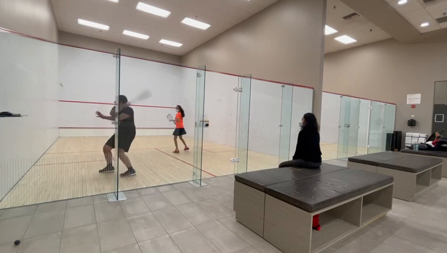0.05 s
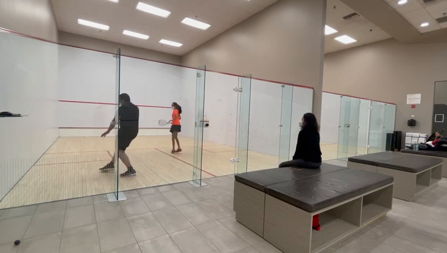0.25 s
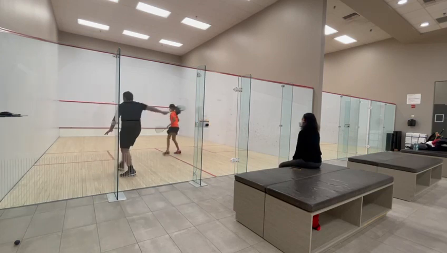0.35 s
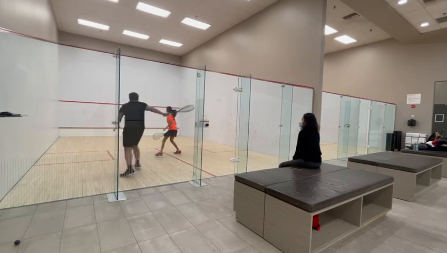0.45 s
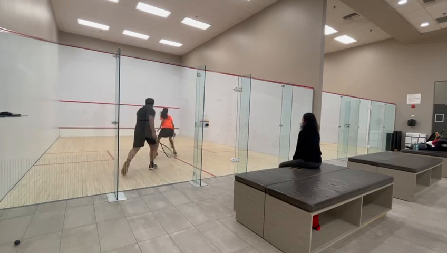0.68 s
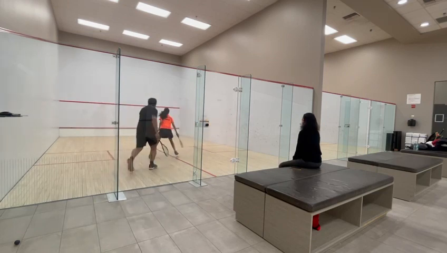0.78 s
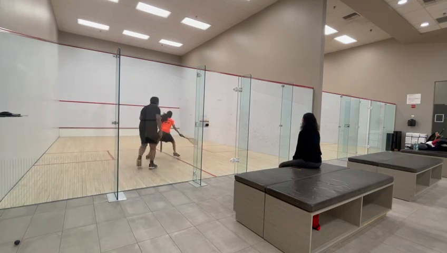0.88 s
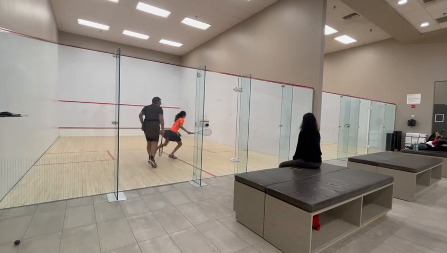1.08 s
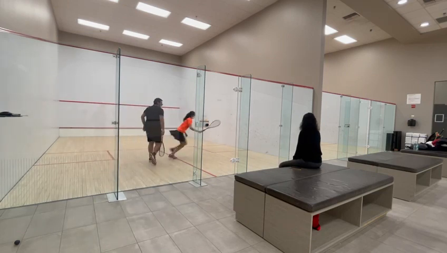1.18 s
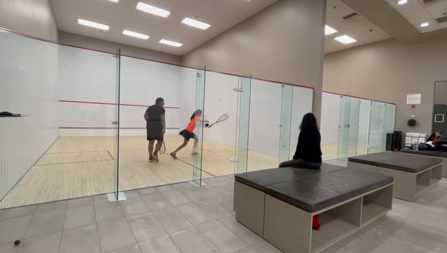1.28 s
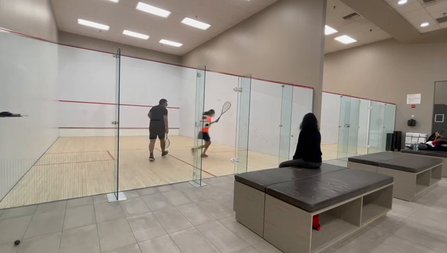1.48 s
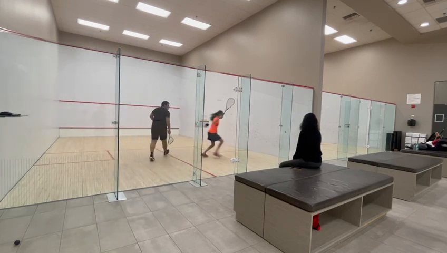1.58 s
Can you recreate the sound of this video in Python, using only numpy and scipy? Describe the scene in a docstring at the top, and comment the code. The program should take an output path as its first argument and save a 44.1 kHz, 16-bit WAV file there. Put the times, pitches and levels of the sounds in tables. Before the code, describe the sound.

Sharp racket hit and hard ball knock on a wall, ringing through a reverberant squash court

```python
"""A squash court, heard through its glass back wall: a swish and racket smack with its echo from the front
wall, the ball on the wall with a panel knock, a soft floor bounce and shoe scuffs, as an earlier sound fades in
the hall. Bands of noise make their echoes and the hall behind; decaying sine waves ring in racket frame, wall,
glass and court. Dry snaps lead some blows. Footfalls thud in the sprung floor, whose rumble lies over
ventilation hum. A phone's two microphones listen."""
import sys
import numpy as np
from scipy import signal
from scipy.fft import rfft, irfft
from scipy.io import wavfile
from scipy.ndimage import uniform_filter1d

SR = 44100
rng = np.random.default_rng(int(sys.argv[2]) if len(sys.argv) > 2 else 0)


def materialize(psi):
    """Save the field psi as 16-bit PCM at rate SR to the path in sys.argv[1].

    A 1-D psi becomes a single channel; in a 2-D psi each row is a channel.
    """
    bounded = np.clip(np.atleast_2d(psi).T, -1, 1)
    quanta = np.round(bounded * 32767).astype(np.int16)
    wavfile.write(sys.argv[1], SR, quanta)


def ratio(d):
    """dB to gain"""
    e = np.asarray(d, float) / 20
    return 10 ** e


N = 72765  # samples, 1.65 s

# Colour of each kind of sound, only its shape counts: [f/Hz, relative level per Hz/dB]
RACKET_COLOUR = [(88, -35), (170, -14.5), (450, -3), (990, -8.5), (1170, -19), (2070, -9), (2280, -17),
                 (2640, -8), (5530, -24.5), (6530, -9.5), (12500, -40), (16200, -91), (22000, -120)]
RETURN_COLOUR = [(150, -71), (290, -17), (380, 0), (560, -16), (1090, -3.5), (1760, -10.5), (2600, -18.5),
                 (3300, -20.5), (8160, -29.5), (9460, -38), (10400, -70)]
WALL_COLOUR = [(220, -46), (330, -4.5), (800, -3.5), (1280, -1.5), (1640, -10.5), (2500, -11), (3300, -16),
               (5550, -15.5), (8190, -18), (11500, -12), (12500, -72), (16200, -104), (22000, -120)]
KNOCK_COLOUR = [(150, -23), (220, -25), (300, -21), (1000, -13), (1500, -8), (1950, -2), (2600, -5),
                (3300, -35), (5600, -43), (9000, -38), (10500, -59)]  # the wall panel
BOUNCE_COLOUR = [(120, -76), (200, -32), (317, -20), (361, -14), (403, -7.5), (546, -8), (1060, -2.5),
                 (1800, -12.5), (2600, -19), (3400, -31), (9000, -66), (11700, -95), (19800, -120)]
SCUFF_COLOUR = [(700, -36), (2000, 2), (3200, -4), (4200, -3.5), (6500, -13), (8500, -14), (10000, -41)]
SWISH_COLOUR = [(500, -8), (1500, -2), (3000, 1.5), (6500, -2), (9000, -16), (12000, 5)]
HALL_COLOUR = [(88, -33), (150, -14.5), (260, -7), (307, -7.5), (739, -14.5), (905, -9), (2430, -25.5),
               (2570, -32), (8790, -48), (10200, -57), (12000, -16), (15600, -75), (22000, -120)]

# Arrivals of each kind: [t/s, first echoes level/dB, rise time constant/s, first echoes t60/s, # reverberation
# level/dB, left minus right of the first echoes/dB]; the first scuff row, set before the start, # is the fading
# hall tail of an earlier sound
RACKET_ARRIVALS = [(0.2321, -15, 0.00074, 0.068, -22.5, 6.5)]
RETURN_ARRIVALS = [(0.275, -0.5, 0.026, 0.09, -29, 0), (0.297, -10.5, 0.0056, 0.084, -35, 0.98)]
WALL_ARRIVALS = [(0.389, -7, 0.0075, 0.053, -45, 0.83), (0.394, -10, 0.002, 0.13, -21.5, 1)]
KNOCK_ARRIVALS = [(0.403, -9.5, 0.0025, 0.082, -32, 3.5), (0.448, -36, 0.0075, 0.05, -26.5, 2)]
BOUNCE_ARRIVALS = [(0.218, -30, .004, 0.103, -21, 3.3), (.61, -33, 0.0033, 0.078, -53, 1.2),
                   (0.863, -17, 0.011, 0.1, -29.5, 2), (.97, -21, 0.02, 0.16, -30, 2),
                   (1.09, -26, 0.017, 0.28, -43, 2)]
SCUFF_ARRIVALS = [(-.05, -49.5, .01, 0.44, -56, 1), (1.003, -48.5, .002, 0.052, -51.5, 0.93),
                  (1.183, -39, 0.0012, 0.045, -50, 1), (1.21, -48, .02, 0.28, -73, 1),
                  (1.43, -68, 0.033, 0.23, -51.5, 0.33), (1.468, -42.5, 0.0025, 0.064, -52.5, 1)]

# Time the long reverberation takes to fall 60 dB: [f/Hz, t60/s]
REVERB_T60 = [(100, 0.58), (250, 2.4), (400, 1.92), (700, 3.26), (1100, 2.71), (2000, 1.81), (3000, 1.35),
              (4500, 0.98), (6500, 0.71), (8500, 0.61), (10000, 0.3), (12000, .1)]

# Dry snaps: [t/s, peak level/dB, left minus right/dB, a seventh of the t60/s]
SNAPS = [(0.2322, -12.5, 7, 0.003), (0.41, -28, -6, .002), (1.186, -55, -7, 0.0012)]

# Notes at which each part rings: [f/Hz, relative level/dB, t60/s]
FRAME_MODES = [(1169, 21, 0.077), (3040, -9, 0.016), (6700, -5, .02), (8400, -1, .015)]
WALL_MODES = [(267, -1, .06), (1255, -8, .08), (1867, 1, .08), (2195, 0, .08), (2450, -1, .08),
              (2880, -8, .07)]
GLASS_MODES = [(342, 0, .1), (378, -18, .4), (402, -19, .35), (436, -9, .1)]
COURT_MODES = [(573.7, -3, 1), (662, -9, 0.43), (828, -5, 0.95), (831, 7, 0.74), (1020, 6, 0.63),
               (1128, 7, 0.66), (1250, 5, .7), (1380, -19, 0.52), (2260, -12, 0.36), (2464, -6, 0.41),
               (2646, -4.5, .6)]

# Times those parts are set ringing: [t/s, highest short-time level/dB, push time/s,
# blow over the shaking/dB, left minus right/dB]; a negative push gives the shortest shaking
FRAME_RING = (.2335, -24, -0.0723, 16.5, 10.5)  # a single row
WALL_RING = (.4, -16.5, .005, 18, 0)  # a single row
GLASS_RINGS = [(.24, -27, .01, 20, 0), (.273, -15.5, .012, 27, 0), (.354, -24, .012, 20, 0),
               (.452, -24, .012, 20, 0)]
COURT_RINGS = [(.29, -34, 0.058, 0, 2), (.44, -24.5, 0.14, 0, 2.5), (.87, -34.5, 0.19, 0, 1.7)]

# Thuds of the floor boards: [t/s, starting level/dB, f/Hz, t60/s]
THUDS = [(0.073, -27.5, 57.7, 0.61), (0.147, -47, 60.3, 0.22), (0.237, -28.5, 47.6, 0.37),
         (0.404, -35.5, 155, 0.82), (0.941, -36, 53.3, 0.46), (1.09, -37, 68, 0.19), (1.24, -43, 74.4, 0.2),
         (1.418, -37, 70.4, 0.24), (1.419, -33.5, 133, 0.65), (1.42, -52, 184, 0.75), (1.53, -29, 65, 0.27),
         (1.6, -47, 55.6, 0.18)]

# Rumble of the sprung floor: [t/s, deep band level/dB, higher band level/dB]
RUMBLE = [(0.0, -41.5, -44), (0.16, -36.5, -45), (0.202, -48, -46), (0.241, -44, -36), (0.366, -40.5, -45),
          (0.404, -35, -40), (0.496, -46.5, -39), (0.744, -65, -59), (0.772, -44, -55), (0.836, -61, -54),
          (0.946, -52, -49.5), (1.134, -37, -62), (1.152, -43, -48.5), (1.282, -39, -39.5),
          (1.346, -49.5, -48.5), (1.446, -36.5, -34), (1.63, -41, -43.5), (1.65, -56, -34.5)]

# Likeness of left and right noise, limited to -0.95..0.999 in use: [f/Hz, likeness]
LIKENESS = [(60, 3), (130, 0.7), (270, 0.78), (580, -0.1), (1240, -0.03), (2650, -0.14), (5640, 0.19),
            (12000, -0.61)]
# Leaning of the court and hall sound to one side: [f/Hz, left minus right/dB]
LEAN = [(60, 0.0), (110, -1), (190, 2.5), (350, -0.5), (630, 2.5), (1140, 2.5), (2060, 1), (3700, 4),
        (6680, 8), (12000, -9.5)]
# Colour of the microphone ports: [f/Hz, gain/dB]
PORTS = [(1900, -0.5), (2500, -3), (3200, -1.5), (4000, 0), (4800, -2.5), (5200, 1), (5650, -11),
         (6100, 1.5), (6600, 0.5), (7100, -2.5), (7450, -12.5), (7900, 3.5), (8500, 4), (9400, -2.5),
         (10000, -3), (10800, -24.5), (11600, -2.5), (12400, -43)]


def at(table, hz):
    """Reads a table between its rows, with pitch spaced as the ear hears it (log frequency)."""
    rows = np.array(table, float)
    return np.interp(np.log(np.maximum(hz, 1)), np.log(rows[:, 0]), rows[:, 1])


def swell(t, rise, t60):
    """Power that builds up with time constant rise and dies away by 60 dB in t60."""
    t = np.maximum(t, 0)
    build_up = (1 - np.exp(-t / max(rise, 1e-4))) ** 2
    return build_up * 10 ** (-6 * t / max(t60, 0.01))


def pan(pan_db):
    """Left and right gains, half the level difference to each side."""
    return ratio(pan_db * np.array([[0.5], [-0.5]]))


def band(spectra, lo_hz, hi_hz):
    """Left and right noise of one soft-edged band, rms 1, mixed from mid and side to the likeness table."""
    f = np.arange(spectra.shape[1]) * SR / N
    place = np.log(np.maximum(f, 1) / lo_hz) / np.log(hi_hz / lo_hz) - 0.5  # 0 in mid-band
    window = np.where(abs(place) < 1, np.cos(np.pi / 2 * place), 0)
    mid, side = irfft(spectra * window, N)
    likeness = np.clip(at(LIKENESS, np.sqrt(lo_hz * hi_hz)), -0.95, 0.999)
    pair = np.sqrt(1 + likeness) * mid + np.sqrt(1 - likeness) * side * np.array([[1], [-1]])
    return pair / np.sqrt(np.mean(pair ** 2))


def share(colour, mids):
    """Splits a sound's power among bands: power per Hz times a width proportional to pitch."""
    power = ratio(2 * at(colour, mids)) * mids
    return power / np.sum(power)


def snaps():
    """A short dry crack of treble-heavy noise, the same at both microphones but for level."""
    out, t = 0, np.arange(N) / SR
    for start, db, pan_db, length in SNAPS:
        noise = np.diff(rng.standard_normal(N + 1))  # differences favour the treble
        crack = noise * np.sqrt(swell(t - start, 0.00014, 7 * length))
        out = out + crack / np.max(abs(crack)) * ratio(db) * pan(pan_db)
    return out


def court():
    """The hard court as bands of noise: echoes of every arrival, the swish and the hall set each band's power."""
    t = np.arange(0, N, 16) / SR  # levels move in steps of 16 samples
    edges = 140 * 2 ** (np.arange(21) / 3)  # third-octave bands, Hz
    mids = np.sqrt(edges[1:] * edges[:-1])
    kinds = [(RACKET_COLOUR, RACKET_ARRIVALS), (RETURN_COLOUR, RETURN_ARRIVALS), (WALL_COLOUR, WALL_ARRIVALS),
             (KNOCK_COLOUR, KNOCK_ARRIVALS), (BOUNCE_COLOUR, BOUNCE_ARRIVALS), (SCUFF_COLOUR, SCUFF_ARRIVALS)]
    kinds = [(share(colour, mids), rows) for colour, rows in kinds]
    swish_share, hall_share = share(SWISH_COLOUR, mids), share(HALL_COLOUR, mids)
    spectra = grainy_noise(len(t)) * ragged(N // 2 + 1)
    out = 0
    for k, hz in enumerate(mids):
        power = hall_share[k] * hall_power() + swish_share[k] * swish_power(t)
        for part, rows in kinds:
            power = power + part[k] * echo_power(t, rows, hz)
        gain = np.sqrt(power) * flicker(len(t)) * pan(at(LEAN, hz))
        smooth_gain = np.array([np.interp(np.arange(N) / SR, t, side) for side in gain])
        out = out + band(spectra, edges[k], edges[k + 1]) * smooth_gain
    return out


def echo_power(t, arrivals, hz):
    """Each arrival gives a quick cluster of first echoes, panned, and a central tail that dies at its band's rate."""
    power, build_s = np.zeros((2, len(t))), 0.02
    for start, first_db, rise, t60, tail_db, pan_db in arrivals:
        cluster = ratio(2 * first_db) * swell(t - start, rise, t60) * pan(pan_db) ** 2
        tail = ratio(2 * tail_db) * swell(t - start, build_s, at(REVERB_T60, hz))
        power = power + cluster + tail
    return power


def swish_power(t):
    """The strings swish ever louder through the air just before the blow."""
    return ratio(2 * np.interp(t, (0.19, 0.232), (-62.5, -29.5), left=-99, right=-99))


def grainy_noise(count):
    """Spectra of two noises whose level jitters quickly, like crowded small echoes."""
    grain_db = 0.5  # per unit of jitter, which averages 1
    grain = uniform_filter1d(rng.exponential(1, (2, count)), size=4)
    jitter = np.repeat(grain, 16, axis=1)[:, :N]
    return rfft(rng.standard_normal((2, N)) * ratio(grain_db * jitter))


def ragged(bins):
    """Uneven room resonances: random peaks and dips along frequency."""
    depth_db, width_hz = 1.1, 27
    k = max(int(width_hz * N / SR), 1)
    bumps = uniform_filter1d(uniform_filter1d(rng.standard_normal((2, bins)), k), k)
    return ratio(depth_db * bumps / bumps.std())


def flicker(count):
    """Random gain that makes one band swell and fade on its own."""
    depth_db, changes_per_s = 2.5, 18
    k = max(int(SR / 16 / changes_per_s), 1)
    wander = uniform_filter1d(uniform_filter1d(rng.standard_normal(count), k), k)
    return ratio(depth_db * wander / wander.std())


def ring(modes, start, db, push, blow_db, pan_db):
    """Decaying sine waves set off by one blow and random shaking; low notes reach both microphones alike."""
    swing_in_s, alike_below_hz = 0.012, 580  # longest build-up; half alike at this pitch
    t = np.arange(SR) / SR
    body = sum(ratio(level) * np.sin(2 * np.pi * hz * t) * 10 ** (-3 * t / max(t60, 0.005))
               for hz, level, t60 in modes)
    body = body * swell(t, min(push, swing_in_s), 1e3)
    shake = rng.standard_normal((3, N)) * np.sqrt(swell(np.arange(N) / SR - start, push / 4, push * 3))
    shake[:, int(start * SR)] += ratio(blow_db)  # the blow is a single click
    left_right, common = np.split(rfft(shake), [2])
    alike = 1 / (1 + (np.arange(N // 2 + 1) * SR / N / alike_below_hz) ** 4)
    drive = np.sqrt(alike) * common + np.sqrt(1 - alike) * left_right
    sound = irfft(drive * rfft(body, N), N)
    loudest = np.sqrt(np.max(uniform_filter1d(np.mean(sound ** 2, axis=0), size=800)))
    return sound / loudest * ratio(db) * pan(pan_db)


def thuds():
    """Each footfall or heavy blow makes the floor boards thud: a low sine wave that dies away."""
    out, t = 0, np.arange(N) / SR
    for start, db, hz, t60 in THUDS:
        tone = np.sin(2 * np.pi * (hz * (t - start) + rng.random()))
        out = out + ratio(db) * np.sqrt(swell(t - start, 0.0016, t60)) * tone
    return out


def rumble():
    """The sprung floor under running feet: a deep and a higher band of noise with moving levels."""
    t = np.arange(N) / SR
    time, deep_db, higher_db = np.array(RUMBLE).T
    spectra = rfft(rng.standard_normal((2, N)))
    deep = band(spectra, 41.4, 102.6) * ratio(np.interp(t, time, deep_db))
    higher = band(spectra, 116.4, 217.6) * ratio(np.interp(t, time, higher_db))
    return deep + higher


def hum():
    """Steady ventilation hum: one low band of noise."""
    return band(rfft(rng.standard_normal((2, N))), 42, 71) * ratio(-48)


def hall_power():
    """The hall behind the court adds a steady background power."""
    return ratio(2 * -43.5)


def scene():
    """Adds snaps, court echoes, ringing parts, thuds, rumble and hum."""
    rings = [(FRAME_MODES, [FRAME_RING]), (WALL_MODES, [WALL_RING]),
             (GLASS_MODES, GLASS_RINGS), (COURT_MODES, COURT_RINGS)]
    ringing = sum(ring(modes, *row) for modes, rows in rings for row in rows)
    return snaps() + court() + ringing + thuds() + rumble() + hum()


def band_limit(x):
    """A steep low-pass at the top of the band."""
    return signal.sosfilt(signal.butter(12, 12630, fs=SR, output="sos"), x)


def record(dry):
    """The microphone ports colour the sound and loud peaks are softly rounded off."""
    port_gain = ratio(at(PORTS, np.arange(N // 2 + 1) * SR / N))
    coloured = irfft(rfft(dry) * port_gain, N)
    mix = np.tanh(coloured)
    return band_limit(mix)


dry = scene()
out = record(dry)
materialize(out)
```